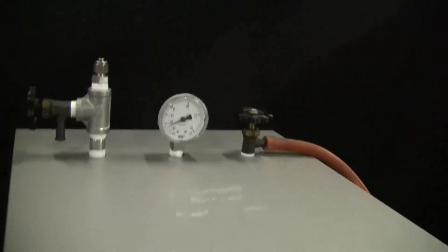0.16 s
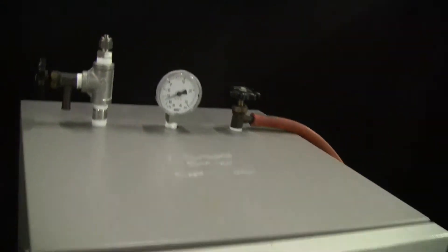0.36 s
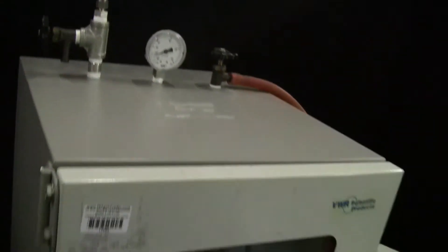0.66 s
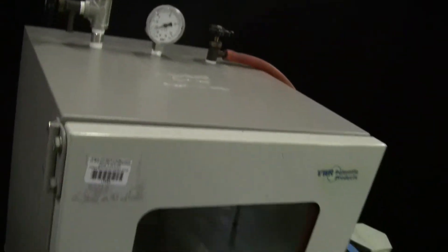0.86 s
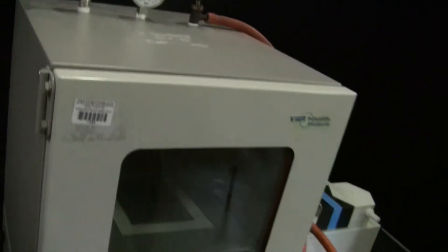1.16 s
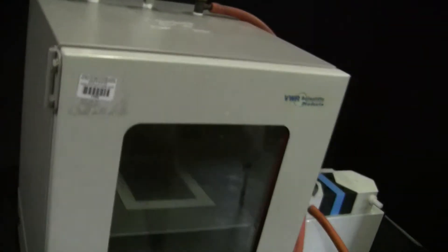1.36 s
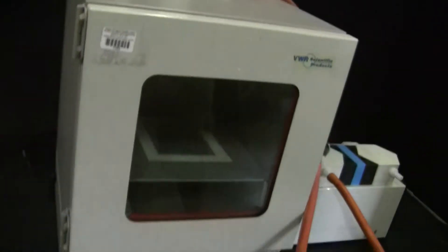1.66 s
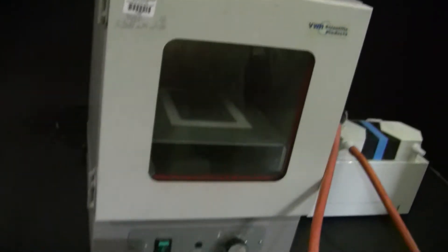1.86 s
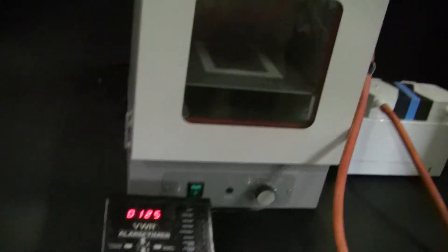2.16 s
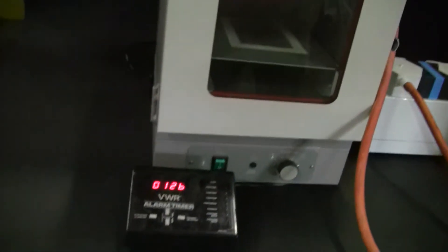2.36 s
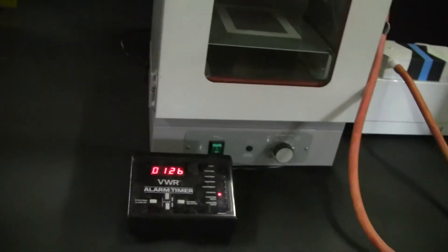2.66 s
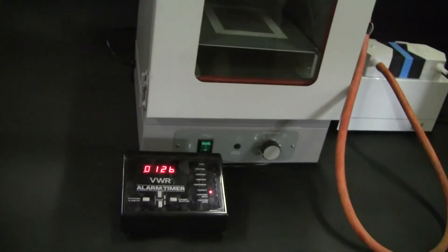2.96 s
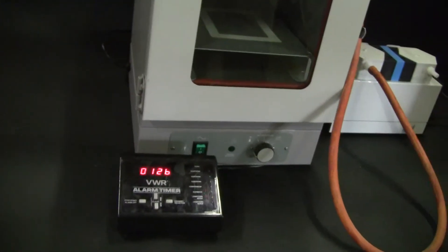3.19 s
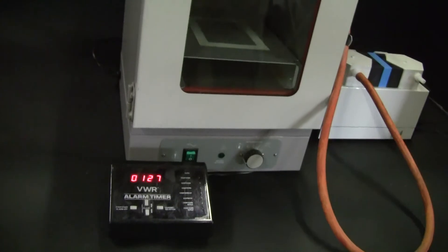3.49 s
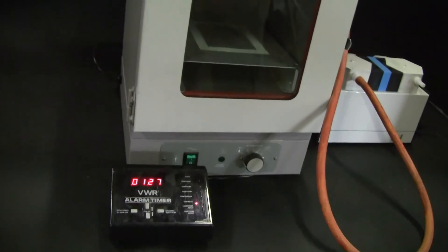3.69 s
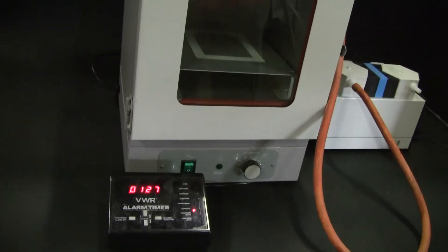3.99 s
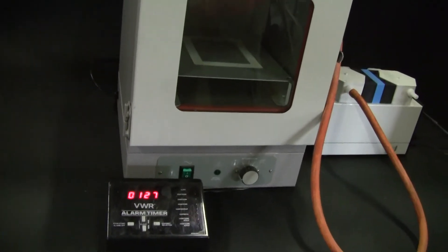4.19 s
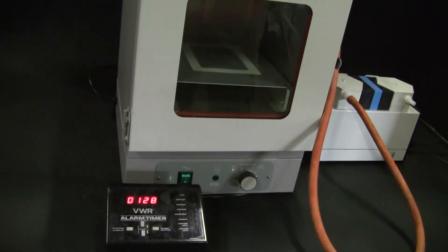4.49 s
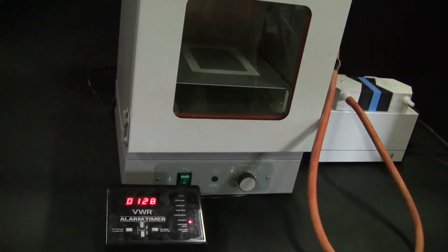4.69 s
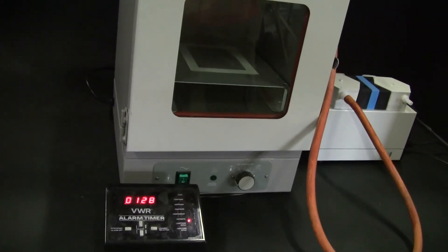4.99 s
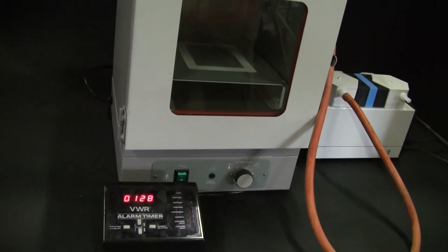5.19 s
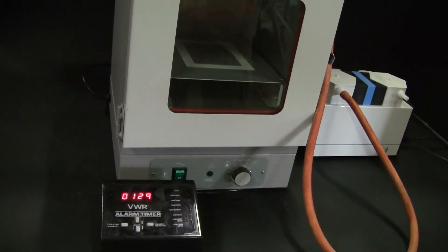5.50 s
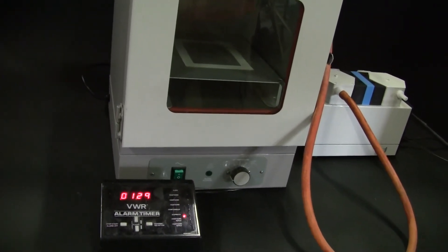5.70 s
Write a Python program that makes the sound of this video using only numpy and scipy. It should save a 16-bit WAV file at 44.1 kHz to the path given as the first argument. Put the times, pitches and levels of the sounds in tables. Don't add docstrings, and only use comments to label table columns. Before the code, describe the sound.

Fast, regular pump pulses with a metallic clatter and motor hum run unbroken indoors, with a soft rustle and one tiny tap.

```python
import sys
import numpy as np
from scipy import signal
from scipy.fft import rfft, irfft, next_fast_len
from scipy.io import wavfile
from scipy.ndimage import map_coordinates

SR = 44100
rng = np.random.default_rng(int(sys.argv[2]) if len(sys.argv) > 2 else 0)


def dump_mix(stems):
    frames = np.atleast_2d(stems).T
    limited = np.clip(frames, -1, 1)
    pcm = np.round(limited * 32767).astype(np.int16)
    wavfile.write(sys.argv[1], SR, pcm)


def decibels_to_gain(level_db):
    exponent = np.asarray(level_db, float) / 20
    return 10 ** exponent


N = 257984

TURN_S, FIRST_POP_S, SOUND_M_PER_S = 0.03518, -0.0015, 343
SHAFT_HZ = 28.432
TAP_S = 2.4985

# f/Hz, level/dB per Hz
AIR_COLOUR = [(40, -36), (80, -10), (115, 0), (250, 1.5), (450, -3), (700, 2), (1100, -4), (1500, -4),
              (1800, -7), (2500, -13.5), (2900, -16), (6000, -22), (10000, -24), (16000, -55)]
AIR_LEVEL = (-38.5, -39.5, -40, -40)
# f/Hz, likeness
AIR_LIKENESS = [(100, 0.93), (1000, 0.89), (2500, 0.83), (5000, 0.83), (12000, 0.071)]

# t/s, distance/m
DISTANCE = [(.1, .964), (.45, 1.07), (.8, 1.152), (1.5, 1.252), (2.1, 1.33), (2.9, 1.375), (3.8, 1.389),
            (4.8, 1.314), (5.7, 1.214)]
# t/s, station (0 above the cabinet, 1 its edge, 2 its corner, 3 in front)
CAMERA_PATH = [
    (0, 0),
    (.9, 1),
    (1.7, 2),
    (2.6, 2.8),
    (5.85, 3),
]

# highest pitch that survives, f/Hz
POP_TOP = [842.0, 567.0, 515.0, 341.0]
POP_LAG = [
    (0, 0, 0, 0),
    (3.1, 3.1, 3.1, 3.1),
    (6.54, 6.4, 6.17, 5.73),
    (10.12, 10.07, 9.8, 9.69),
]
POP_LEVEL = [
    (1.3, 2.2, .6, 0),
    (7.6, 7.8, 5.3, 4.5),
    (-7, -5.5, -14, -16),
    (-1, 2.4, .8, -.5),
]
# f/Hz, width/Hz
HOUSING = [(137.0, 46.0), (218.0, 12.0), (260.0, 37.0), (317.0, 35.0), (420.0, 24.0), (481.0, 39.0),
           (672.0, 45.0), (888.0, 157.0), (1143.0, 29.0), (1444.0, 452.0)]
HOUSING_PRESSURE = [(0.7, 0.63, 1, 0.73), (2, 0.84, 0.48, 0.12), (-0.86, -1.47, 0.92, 1.52),
                    (2.5, 3, 0.05, -0.72), (-2.5, -3, -1.65, 1.06), (0.45, 0.1, -0.71, -.75),
                    (-0.7, -.85, -0.4, -0.63), (-0.66, -0.82, -.75, -0.61), (-0.3, 0.58, -0.51, -0.29),
                    (0.26, 0.26, 0.203, 0.026)]
DOOR_PRESSURE = (0.47, -0.37, -2.5, -2.5)

# shaft multiple above the hum, level/dB
SLOTS = [(0, -52), (43, -60), (44, -54), (45, -64), (65, -62), (66, -51), (67, -55)]
# shaft multiple, level/dB
BEARING = (82, -58)
LOW_WHINE = (3, 5.2, 2.7, 0.7)
HIGH_WHINE = (-5.5, -6, -9, -4)
# t/s, level/dB, width/s
SHADOW = (1.28, -18, 0.32)

# f/Hz, width/Hz, level/dB
VALVE_PLATE = [(3684, 57, -6), (4800, 340, -14.5), (5180, 123, -11), (7040, 180, -2), (8025, 200, -1),
               (9900, 190, 0.5), (11320, 255, 1), (12800, 260, -2), (14750, 570, -9)]
GROUP_EDGES = [7500, 8700, 10600]
# level/dB, its beam crosses the camera t/s, gain/dB, width/s
BEAMS = [
    (-51, 0.069, 2, 0.22),
    (-56, 1.4, 6.5, 0.63),
    (-54, 1.47, 6.5, 0.23),
    (-58, 0.37, 8, 0.26),
]
GLINT_DB, GLINTS_PER_S = 2, 3.253

# f/Hz, level/dB
LEAN = [(100, .3), (300, 0.5), (430, -0.5), (650, -3.5), (950, -0.5), (1500, -2), (2400, -1.5), (7000, -2),
        (10000, -1), (14000, 1)]
# f/Hz, phase/radians
LEAD = [(80, 0.15), (450, -0.33), (800, 0.45), (2000, -0.033), (6000, -1.05), (7000, -0.85), (9000, -0.055),
        (11500, -1.72), (14500, -1.76)]

# f/Hz, time to fall 60 dB/s
ROOM_FADE = [(150, 0.039), (1000, 0.28), (3000, 0.023)]
# f/Hz, level/dB
ROOM_COLOUR = [(100, 6), (300, 29.5), (520, -7), (750, 11.5), (1100, 3.5), (1500, 4), (1750, -5.5),
               (2350, 6), (2900, -7), (6000, -40)]
ROOM_LEVEL = (-33.5, -33.5, -37, -39)

# start t/s, attack/s, hold/s, time to fall 60 dB/s, level/dB
BRUSHES = [
    (0.833, 0.044, 0.032, .1, -38.5),
    (2.479, 0.025, 0.063, 0.24, -39),
]
# f/Hz, level/dB per Hz
CLOTH = [
    [(900, -21), (1500, 5), (2200, -2), (3300, -11), (7000, -13), (16000, -32)],
    [(710, -35), (1200, -7), (2650, 1), (3660, -7.5), (7020, -7), (11400, -11), (16000, -32)],
]
# f/Hz, level/dB, time to fall 60 dB/s
TAP = [(3230, -30, .009), (2600, -38, 0.01)]

# f/Hz, level/dB
MIC = [(20, -49), (57, -11), (85, -10), (115, -2.5), (200, -1.5), (250, 0), (15800, 0.5), (16100, -40)]


def unit(x):
    return x / np.sqrt(np.mean(x ** 2) + 1e-20)


def along(points, hz):
    f, value = np.transpose(points)
    return np.interp(np.log(hz + 1), np.log(f + 1), value)


def curves(rows, s=None):
    at, *columns = np.transpose(rows)
    if s is None:
        s = np.arange(N) / SR
    return np.array([np.interp(s, at, column) for column in columns])


def stations(values, s=None):
    place = curves(CAMERA_PATH, s)[0]
    return np.array([np.interp(place, np.arange(4), v) for v in np.atleast_2d(values)])


def bump(s, centre_s, db, width_s):
    return db * np.exp(-((s - centre_s) / width_s) ** 2)


def wobble(rate):
    points = rng.standard_normal(int(N * rate / SR) + 4)
    return map_coordinates(points, [np.arange(N) * rate / SR])


def filtered(x, response):
    m = next_fast_len(N + SR // 2)
    spectrum = rfft(x, m) * response(np.fft.rfftfreq(m, 1 / SR))
    return irfft(spectrum, m)[..., :N]


def resonance(f, hz, width_hz):
    return 1j * f * width_hz / (hz * hz - f * f + 1j * f * width_hz)


def rush(spectrum, alike):
    def shape(hz):
        turn = np.arccos(np.clip(along(alike, hz), -1, 1)) / 2
        return decibels_to_gain(along(spectrum, hz)) * [np.cos(turn), np.sin(turn)]

    mid, side = filtered(rng.standard_normal((2, N)), shape)
    return unit(np.array([mid + side, mid - side]))


def strokes():
    s = FIRST_POP_S + TURN_S * np.arange(-4, N / SR / TURN_S)
    return s + curves(DISTANCE, s)[0] / SOUND_M_PER_S


def laid_out(s, spectra, size=8192, lead=256):
    at = s * SR - lead + SR
    whole = np.floor(at).astype(int)
    shift = np.exp(-2j * np.pi * np.fft.rfftfreq(size) * (at - whole + lead)[:, None])
    rows = irfft(spectra * shift, size)
    places = whole[:, None] + np.arange(size)
    return np.bincount(places.ravel(), rows.ravel(), N + 2 * SR)[SR:SR + N]


def ventilation():
    return decibels_to_gain(stations(AIR_LEVEL) + 0.4 * wobble(5)) * rush(AIR_COLOUR, AIR_LIKENESS)


def exhaust(s, jitter_ms=0.01, scatter_db=0.2):
    f = np.fft.rfftfreq(8192, 1 / SR)
    chance = rng.standard_normal((len(s), 2))
    pops = 0
    for lag_ms, db, hz in zip(stations(POP_LAG, s), stations(POP_LEVEL, s), POP_TOP):
        delay = 2j * np.pi * f * lag_ms[:, None] / 1000
        pops = pops + decibels_to_gain(db)[:, None] * -1j * f / hz * np.exp(-(f / hz) ** 2 - delay)

    fade = 1 / (1 + (f / 2200) ** 4)
    modes = [resonance(f, hz, width) * fade for hz, width in HOUSING]
    rings = stations(HOUSING_PRESSURE, s).T @ modes
    rings += stations(DOOR_PRESSURE, s).T * resonance(f, 424.5, 8) * fade

    snap = -decibels_to_gain(-22.5) * resonance(f, 1470, 570) * np.exp(2j * np.pi * f * 0.000593)
    snap *= np.exp(-(f / 2600) ** 4)
    strength = 10 * decibels_to_gain(scatter_db * chance[:, 1:])
    return laid_out(s + chance[:, 0] * jitter_ms / 1000, strength * (pops + rings + snap))


def motor():
    t = np.arange(N) / SR
    low, high = stations([LOW_WHINE, HIGH_WHINE])
    high = high + 3 + bump(t, *SHADOW)

    def tone(hz, db):
        level = decibels_to_gain(db + 0.96 * wobble(3.1))
        return level * np.sin(2 * np.pi * (hz * t + rng.random()) + 0.075 * wobble(4.23))

    whine = 0
    for k, db in SLOTS:
        station_db = (k > 0) * (low if k < 50 else high)
        whine = whine + tone(120 + k * SHAFT_HZ, db + station_db)
    return np.sqrt(2) * (whine + tone(BEARING[0] * SHAFT_HZ, BEARING[1]))


def clatter(s):
    f, t = np.fft.rfftfreq(2048, 1 / SR), np.arange(2048) / SR
    rise = np.clip(t / 0.003, 0, 1) ** 2
    burst = rise * decibels_to_gain(-60 * np.clip(t - 0.003, 0, 1) / 0.037)
    shared = rng.standard_normal((len(s), 2048))
    own = rng.standard_normal((2, len(s), 2048))

    at = np.clip(s * SR, 0, N - 1).astype(int)
    groups = np.array([db + bump(s, *beam) + GLINT_DB * wobble(GLINTS_PER_S)[at] for db, *beam in BEAMS])
    blow_db = rng.normal(0, 0.8, len(s))

    scrape = f ** 4 / (f ** 4 + 6000 ** 4) / (1 + (f / 12000) ** 4)
    plate = decibels_to_gain(groups.mean(0) + blow_db - 12)[:, None] * scrape + 0j
    for k, (hz, width, db) in enumerate(VALVE_PLATE):
        group = groups[np.searchsorted(GROUP_EDGES, hz)]
        level = group + db + blow_db + rng.normal(0, 1.8, len(s))
        plate += (-1) ** k * decibels_to_gain(level)[:, None] * resonance(f, hz, width)
    ears = plate * rfft((shared + 0.44 * own) * burst) * decibels_to_gain(29.5)
    return np.array([laid_out(s - 0.0019, ear, size=2048, lead=0) for ear in ears])


def room(s):
    clicks = laid_out(s, np.ones((len(s), 513)), size=1024)
    hz, t, z = signal.stft(rng.standard_normal((4, 2, SR // 4)), SR, nperseg=256)
    shape = decibels_to_gain(along(ROOM_COLOUR, hz)[:, None] - 60 * t / along(ROOM_FADE, hz)[:, None])
    tails = signal.istft(z * shape, SR, nperseg=256)[1]
    tails[:, 1] = tails[:, 0] + 0.4 * tails[:, 1]

    place = curves(CAMERA_PATH)[0]
    answer = 0
    for k, tail in enumerate(tails):
        near = np.cos(np.pi / 2 * np.clip(place - k, -1, 1))
        answer = answer + signal.fftconvolve((clicks * near)[None], tail, axes=1)[:, :N]
    return unit(answer)


def brushes():
    s = np.arange(N) / SR

    def swell(start, attack, hold, t60, db):
        rise = np.clip((s - start) / attack, 0, 1) ** 2
        fall_db = 60 * np.clip(s - start - attack - hold, 0, 1) / t60
        return rise * decibels_to_gain(db - fall_db + 2 * wobble(150))

    t = np.clip(s - TAP_S, 0, 1)
    sound = sum(decibels_to_gain(db - 60 * t / t60) * np.sin(2 * np.pi * hz * t) for hz, db, t60 in TAP)
    for brush, cloth in zip(BRUSHES, CLOTH):
        sound = sound + swell(*brush) * rush(cloth, [(1000, 1.0), (8000, 0.8)])
    return sound


def scene():
    s = strokes()
    ear = np.array([[0.5], [-0.5]])

    def ports(hz):
        return decibels_to_gain(ear * along(LEAN, hz)) * np.exp(1j * ear * along(LEAD, hz))

    air = ventilation()
    pump = filtered(exhaust(s) + motor() + clatter(s), ports)
    return pump + decibels_to_gain(stations(ROOM_LEVEL)) * room(s) + air + brushes()


def roll_off(x):
    return signal.sosfilt(signal.butter(12, 16800, fs=SR, output="sos"), x)


def record(dry):
    hiss = decibels_to_gain(-64) * rng.standard_normal(dry.shape)
    mix = filtered(dry + hiss, lambda hz: decibels_to_gain(along(MIC, hz)))
    return roll_off(mix)


dry = scene()
out = record(dry)
dump_mix(out)
```